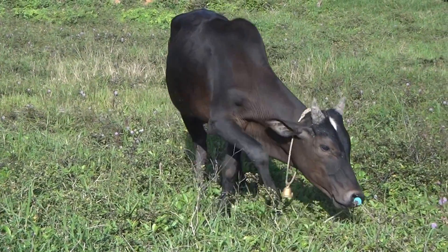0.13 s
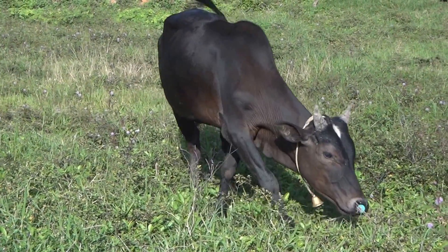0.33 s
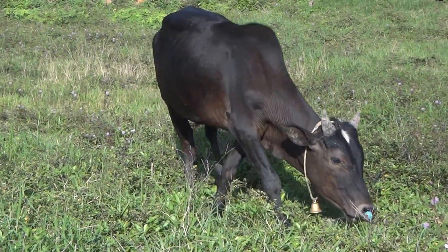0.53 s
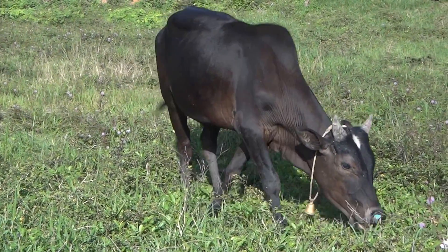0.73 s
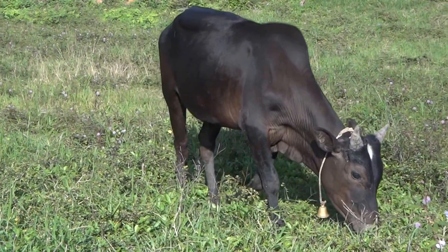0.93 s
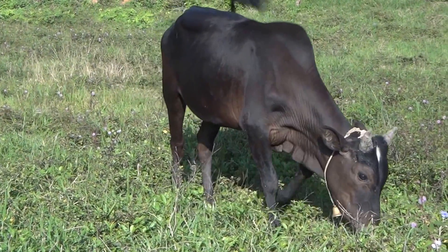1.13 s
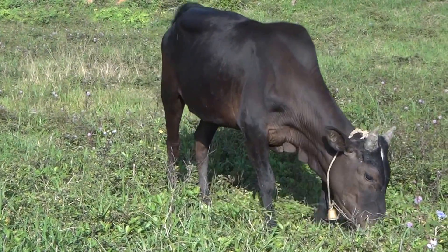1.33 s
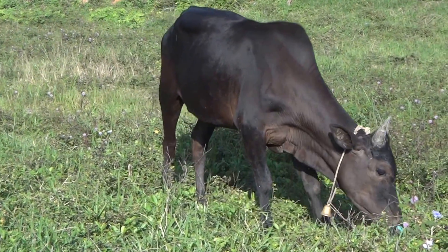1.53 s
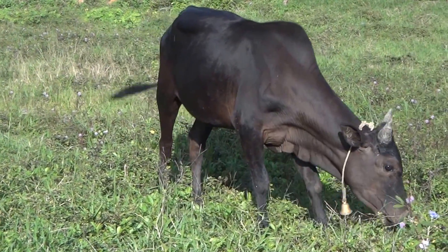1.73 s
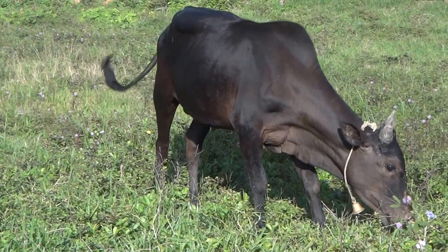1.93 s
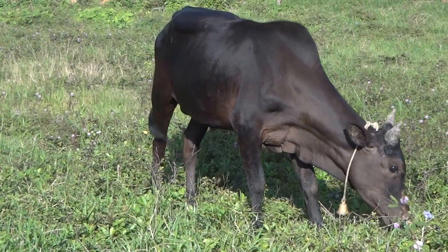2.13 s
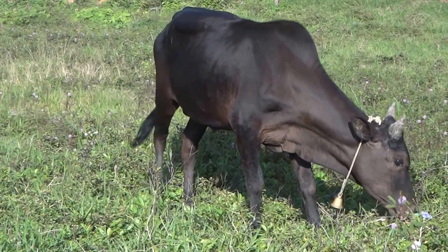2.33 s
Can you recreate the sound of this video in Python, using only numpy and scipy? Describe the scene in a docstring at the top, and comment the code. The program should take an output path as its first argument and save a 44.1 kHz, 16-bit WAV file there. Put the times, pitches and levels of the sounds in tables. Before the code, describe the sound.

Bright metallic bell strikes cluster near the start, followed by shimmering decay and light later touches, with faint bird whistles, grass swishes, a soft hoof and thin cricket buzz; outdoors, fairly close stereo microphone, almost no echo.

```python
"""An open field where a cow grazes with a small brass bell on her neck. A far bird whistles in falling sine tones.
A bush cricket buzzes, a tone and noise pulsed by its wing strokes, over a chorus of filtered noise; swells of noise
make the grass and a hoof, and low noise the distant rumble. A step swings the clapper hard against the bell wall:
decaying modes ring in close pairs that beat. Later it only touches the wall, and rings faintly itself."""
import sys
import numpy as np
from scipy import signal
from scipy.fft import rfft, irfft, next_fast_len
from scipy.io import wavfile
from scipy.ndimage import map_coordinates

SR = 44100
rng = np.random.default_rng(int(sys.argv[2]) if len(sys.argv) > 2 else 0)


def bounce(signal):
    """Save signal as a 16-bit WAV file at the path given by the first command-line argument."""
    frames = np.transpose(np.atleast_2d(signal))
    limited = np.clip(frames, -1, 1)
    pcm = np.round(limited * 32767).astype(np.int16)
    wavfile.write(sys.argv[1], SR, pcm)


N = 110250

# Likeness of left and right in the broad noises of the field.
# Each row: frequency in Hz, left-right correlation from 0 to 1.
FIELD_ALIKE = [(60, .995), (150, 1), (280, .78), (550, 0.37), (1200, 0.24), (5000, 1)]


def amp(db):
    """Decibel law: the amplitude gain of a level in dB."""
    return 10 ** (np.asarray(db) / 20)


def unit(x):
    """Power normalization: x scaled to rms 1."""
    return x / np.sqrt(np.mean(x ** 2) + 1e-20)


def clock():
    """Sampling: the time of each sample in seconds."""
    return np.arange(N) / SR


def curve(rows):
    """Linear interpolation in time between (s, value) points."""
    return np.interp(clock(), *np.transpose(rows))


def along(points, hz):
    """Interpolation between (Hz, value) points on a logarithmic frequency axis."""
    point_hz, values = np.transpose(points)
    return np.interp(np.log(hz + 1), np.log(point_hz + 1), values)


def wobble(rate):
    """Random modulation: a smooth curve through normal knots, rate of them a second."""
    knots = rng.standard_normal(2 ** 13)
    return map_coordinates(knots, [clock() * rate], mode="mirror")


def filtered(x, response):
    """Linear filtering: the spectrum of x times a response of frequency."""
    size = next_fast_len(N + SR // 2)
    spectrum = rfft(x, size) * response(np.fft.rfftfreq(size, 1 / SR))
    return irfft(spectrum, size)[..., :N]


def rush(level_at, alike):
    """Partly coherent stereo noise of rms 1: the mid-side balance sets the left-right correlation."""
    def mid_side_gains(hz):
        angle = np.arccos(np.clip(along(alike, hz), -1, 1)) / 2
        return amp(level_at(hz)) * [np.cos(angle), np.sin(angle)]

    mid, side = filtered(rng.standard_normal((2, N)), mid_side_gains)
    return unit(np.array([mid + side, mid - side]))


def pan(db):
    """Intensity stereo: left raised and right lowered by db, so positive is to the left."""
    return amp([[db], [-db]])


def fade(s, t60):
    """Exponential decay: a sudden start at s, down 60 dB after t60 seconds."""
    age = clock() - s
    return (age >= 0) * np.exp(-np.log(1000) * np.maximum(age, 0) / t60)


def struck(s, t60):
    """Finite contact time: a decay that builds up while the clapper touches."""
    rise_s = 0.00039  # time constant of the build-up
    return fade(s, t60) * (1 - np.exp(-np.maximum(clock() - s, 0) / rise_s))


def ring(s, hz, t60):
    """Free vibration: one mode struck at s, a decaying cosine."""
    return struck(s, t60) * np.cos(2 * np.pi * hz * (clock() - s))


def bird():
    """Frequency modulation: short sine whistles whose pitch sags and wavers."""
    # Each row: start in seconds, length in seconds, pitch at the start in Hz (before waver), level in dB.
    notes = [(-.02, 0.036, 2394, -37), (0.103, 0.02, 2320, -42), (0.131, 0.017, 2290, -43.5),
             (1.965, 0.096, 2340, -47), (2.087, 0.024, 2265, -53)]
    sag_hz_per_s, waver_hz = 1600, 14.7
    out = np.zeros(N)
    for s, length, hz, db in notes:
        age = clock() - s
        pitch = hz - sag_hz_per_s * age + waver_hz * wobble(150)
        envelope = np.abs(np.sin(np.pi * np.clip(age / length, 0, 1))) ** .5
        out += amp(db) * envelope * np.sin(2 * np.pi * np.cumsum(pitch) / SR)
    return out


def insects():
    """Stridulation: wing strokes pulse a falling tone and a rasp, over a steady chorus and far crickets."""
    # Spectrum shape of the near rasp. Each row: frequency in Hz, relative level in dB.
    rasp_spectrum = [(5000, -64), (8500, -29.5), (9600, -13), (10400, -3), (10900, -1.5), (11400, -12),
                     (11900, -19), (12300, -41), (15000, -45)]
    # Loudness of the whole near buzz. Each row: time in seconds, gain in dB.
    buzz_level = [(0.0, -35.5), (0.97, -36.5), (0.99, -33.5), (1.3, -39), (1.45, -37), (2.5, -39)]
    # Spectrum shape of the chorus. Each row: frequency in Hz, relative level in dB.
    chorus_spectrum = [(3000, -58), (6300, -37.5), (7200, -23), (8800, -17.5), (10000, -7.5), (10800, -0.5),
                       (11700, -10), (12300, -23.5), (13500, -34.5), (15000, -30)]
    # Far cricket bands. Each row: centre in Hz, half width (6 dB down) in Hz, level in dB.
    far_bands = [(3325, 220, -62.5), (4735, 224, -55.5)]
    # Stereo likeness of all insects. Each row: frequency in Hz, left-right correlation from 0 to 1.
    insect_alike = [(4000, 0.94), (8000, 0.76), (11000, 0.9)]
    wing_hz, sharpness, stroke_scatter_db = 128.4, 1.9, 0.2
    tone_hz, fall_hz, scatter_hz = 10860, 1100, 325.4  # mid-stroke pitch, fall through each stroke, jitter
    tone_db, rasp_db, chorus_db = -4, -6, -37  # tone and rasp before the buzz level

    phase = wing_hz * clock() % 1
    strokes = np.abs(np.sin(np.pi * phase)) ** (2 * sharpness) * amp(stroke_scatter_db * wobble(wing_hz))
    pitch = tone_hz - fall_hz * (phase - .5) + scatter_hz * wobble(2600)
    tone = amp(tone_db) * unit(strokes * np.sin(2 * np.pi * np.cumsum(pitch) / SR))
    rasp = amp(rasp_db) * unit(strokes * rush(lambda hz: along(rasp_spectrum, hz), insect_alike))
    chorus = amp(chorus_db) * rush(lambda hz: along(chorus_spectrum, hz), insect_alike)

    far = np.zeros((2, N))
    for centre, width, db in far_bands:
        far += amp(db) * rush(lambda hz: -20 * np.log10(1 + ((hz - centre) / width) ** 2), insect_alike)
    return (tone + rasp) * amp(curve(buzz_level)) + chorus + far


def air():
    """Broadband ambience: shaped noise for the far rumble and the hush of the open field."""
    # Spectrum shape. Each row: frequency in Hz, relative level in dB.
    air_spectrum = [(25, -21), (50, -8.5), (80, -3), (125, 0), (180, -1), (250, -9), (370, -11.5),
                    (480, -20), (800, -21.5), (1230, -18.5), (1500, -26), (2200, -24.5), (4000, -33),
                    (7000, -30), (15000, -88)]
    # Slow level changes, before the overall gain. Each row: time in seconds, level in dB.
    air_level = [(0.0, -41), (0.19, -44.5), (2.0, -44.5), (2.04, -46), (2.35, -45), (2.37, -47), (2.5, -46)]
    gain_db = 0.76
    return amp(gain_db + curve(air_level)) * rush(lambda hz: along(air_spectrum, hz), FIELD_ALIKE)


def grazing():
    """Friction noise: grainy swishes of grass brushed and torn, and a soft hoof on the soil."""
    # Each row: middle in seconds, Gaussian spread in seconds, level in dB (before grain), band centre in Hz.
    rustles = [(0.087, 0.052, -44.5, 3470), (0.15, .015, -50, 6600), (0.282, 0.038, -53, 1204),
               (0.458, .04, -52, 2920), (0.648, 0.043, -51, 2820), (1.46, 0.038, -52.5, 3500)]
    # Spectrum shape of the hoof on soil. Each row: frequency in Hz, relative level in dB.
    soil = [(100, -26), (250, -3), (370, -3.5), (550, -17.5), (1500, -29)]
    half_width_octaves, grain_db, grass_pan_db = 0.23, 1.5, 3.5
    hoof_s, hoof_spread_s, hoof_db = 1.55, 0.042, -45.5

    def swell(s, spread):
        """Gaussian envelope: a rise and fall around s."""
        return np.exp(-((clock() - s) / spread) ** 2 / 2)

    grass = np.zeros((2, N))
    for s, spread, db, centre in rustles:
        def band(hz):
            """Resonance-like band: 6 dB down at the half width."""
            octaves = np.log2((hz + 1) / centre)
            return -20 * np.log10(1 + (octaves / half_width_octaves) ** 2)

        grain = amp(grain_db * wobble(300))
        grass += amp(db) * swell(s, spread) * unit(grain * rush(band, FIELD_ALIKE))
    hoof = amp(hoof_db) * swell(hoof_s, hoof_spread_s) * rush(lambda hz: along(soil, hz), FIELD_ALIKE)
    return grass * pan(grass_pan_db) + hoof


def bell():
    """Modal synthesis: blows add energy to ringing modes; their place decides which of a pair speaks."""
    # Frequencies of the bell's modes in Hz.
    mode_hz = [1657, 1687, 4765, 4816, 6574, 6645, 6958, 9106, 9172, 10141, 12688, 13340, 13440, 13790,
               13920]
    # The same modes. Each row: dB when struck in front, dB when struck on the flank, decay by 60 dB in seconds.
    modes = [(-31.5, -36, 2.6), (-35.5, -47, 2.84), (-30.5, -18, 0.78), (-12, -21.5, 1.32),
             (-37, -36.5, 1.1), (-27.5, -27, 0.61), (-19, -24, .45), (-15.5, -28.5, 0.24),
             (-42, -25.5, 0.4), (-28, -36, 0.64), (-27, -27.5, 0.17), (-40, -32, .13), (-34, -31, .13),
             (-42, -33, .13), (-39, -37, 0.28)]
    # Clapper blows. Each row: start in seconds, place from 0 (front) to 1 (flank), gain in dB of the hum,
    # of the middle modes and of the top modes, level in dB of the click.
    blows = [(0.2171, 0.054, 1.5, -0.5, 1.5, -26.5), (0.3335, 0.51, -26, -22, -3.5, -35),
             (0.4174, 0.92, -10, 0, 0, -35), (.7766, .6, -35.5, -38, -24, -46),
             (1.2617, 0.47, -13.5, -27.5, -22, -38), (1.5227, 0.82, -10, -25, -17, -41)]
    # Spectrum shape of the click. Each row: frequency in Hz, relative level in dB.
    crack_spectrum = [(800, -40), (1300, -30), (1800, 4.5), (3000, -1.5), (7000, -4.5), (15000, -9.5)]
    # Gain of the hum as the swinging bell turns. Each row: time in seconds, gain in dB.
    hum_swing = [(.22, -6.5), (.3, 2.5), (.39, -5.5), (.45, 3), (.55, -5.5), (.72, -4.5), (.88, -10.5),
                 (1.2, -12), (1.3, -1), (1.38, -9.5), (1.6, 1), (2.5, 5)]
    # Gain of the loudest partial as the bell turns. Each row: time in seconds, gain in dB.
    main_swing = [(.22, -1), (.31, 4.5), (.345, -6), (.37, 0.5), (.41, -11.5), (.425, -12), (.467, -21),
                  (.53, -1.5), (.63, -3.5), (.8, -1.5), (1.3, 1), (1.5, 1), (1.55, 9), (2.1, 6.5)]
    hum_below_hz, top_above_hz, main_hz = 3000, 8000, 4816
    lobes_db, lobes_per_s = 1, 15.67  # the lobes of each other mode sweep past on their own
    mute_s, mute_length_s, mute_db = .8, 0.093, 6  # the bell brushes the neck and loses part of its ring
    crack_t60_s = 0.019

    def lost_db(s):
        return mute_db * np.clip((s - mute_s) / mute_length_s, 0, 1)

    t, out = clock(), np.zeros(N)
    for hz, (front_db, flank_db, t60) in zip(mode_hz, modes):
        energy = np.zeros(N)
        for s, place, hum_db, middle_db, top_db, _ in blows:
            blow_db = hum_db if hz < hum_below_hz else top_db if hz > top_above_hz else middle_db
            place_db = np.interp(place, [0, 1], [front_db, flank_db])
            # a blow is spared the loss that came before it
            energy += (amp(blow_db + place_db + lost_db(s)) * struck(s, t60)) ** 2
        if hz < hum_below_hz:
            swing_db = curve(hum_swing)
        elif hz == main_hz:
            swing_db = curve(main_swing)
        else:
            swing_db = lobes_db * wobble(lobes_per_s)
        carrier = np.cos(2 * np.pi * hz * (t - blows[0][0]))
        out += np.sqrt(energy) * amp(swing_db - lost_db(t)) * carrier

    crack = unit(filtered(rng.standard_normal(N), lambda hz: amp(along(crack_spectrum, hz))))
    clicks = sum(amp(click_db) * fade(s, crack_t60_s) for s, *_, click_db in blows)
    return out + crack * clicks


def clapper():
    """Modal excitation: glancing touches ring the clapper's own modes rather than the wall."""
    # Each row: frequency in Hz, relative level in dB, decay by 60 dB in seconds.
    clapper_modes = [(2050, -56, 0.82), (5608, -31, 0.72), (10230, -27.5, 0.25)]
    # Glancing touches. Each row: start in seconds, gain in dB, brightness in dB per octave about the second mode.
    touches = [(1.4172, -14, 23.5), (1.7461, 0.5, -1.5)]
    # Gain of the clapper's note as the bell turns. Each row: time in seconds, gain in dB.
    clapper_swing = [(1.42, -9.5), (1.52, 2), (1.595, 5), (1.67, 17), (1.75, -2.5), (1.9, 2.5), (1.98, -7),
                     (2.02, 4), (2.1, -7), (2.17, 7)]
    out = np.zeros(N)
    for s, touch_db, bright_db in touches:
        for hz, mode_db, t60 in clapper_modes:
            tilt_db = bright_db * np.log2(hz / clapper_modes[1][0])
            out += amp(mode_db + touch_db + tilt_db) * ring(s, hz, t60)
    return amp(curve(clapper_swing)) * out


def field(x):
    """Diffuse scattering: faint decaying echoes from ground and plants, different on each side."""
    tail = rng.standard_normal((2, N)) * fade(0, .1)  # down 60 dB in 0.1 s
    return signal.fftconvolve(x[None], tail / np.linalg.norm(tail[0]), axes=1)[:, :N]


def scene():
    """Superposition: bird and bell with their scatter, and insects, grass and air around them."""
    bird_pan_db, insect_pan_db, bell_pan_db, scatter_db = 2, 0.28, 0.1, -24
    whistles = bird()
    metal = bell() + clapper()
    direct = whistles * pan(bird_pan_db) + metal * pan(bell_pan_db)
    scattered = amp(scatter_db) * field(metal + whistles)
    return direct + scattered + insects() * pan(insect_pan_db) + air() + grazing()


def record(dry):
    """Band limiting: nothing is kept from 15850 Hz upward."""
    return filtered(dry, lambda hz: hz < 15850)


dry = scene()
out = record(dry)
bounce(out)
```